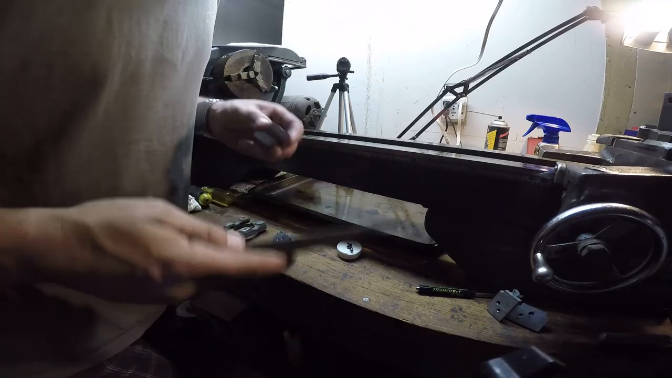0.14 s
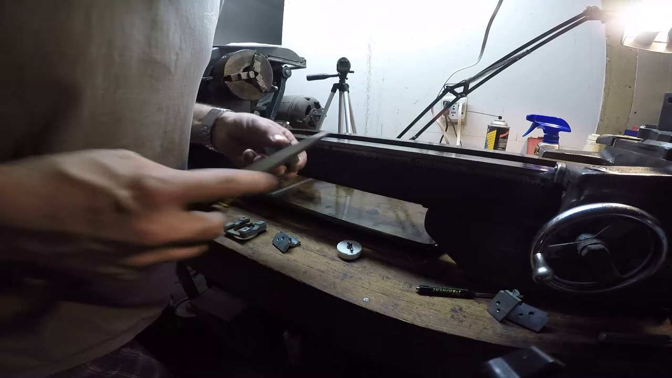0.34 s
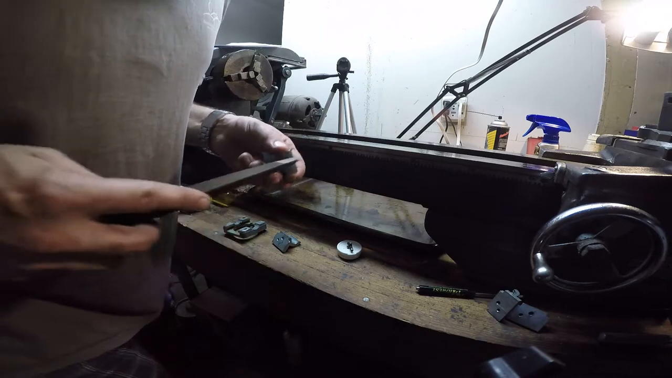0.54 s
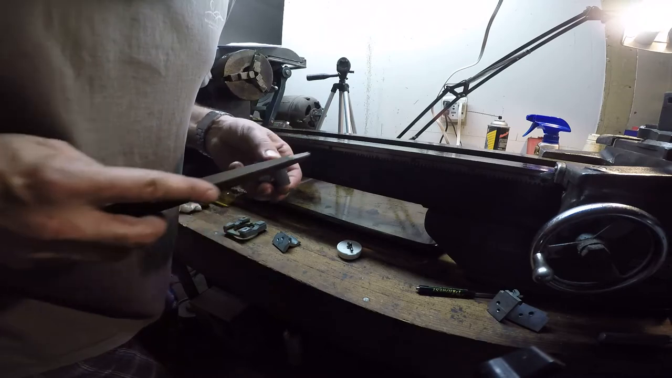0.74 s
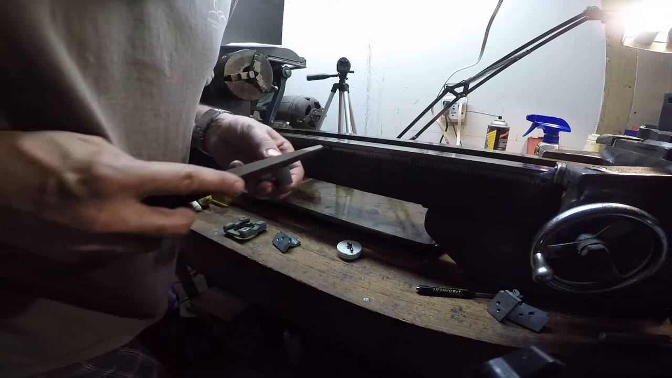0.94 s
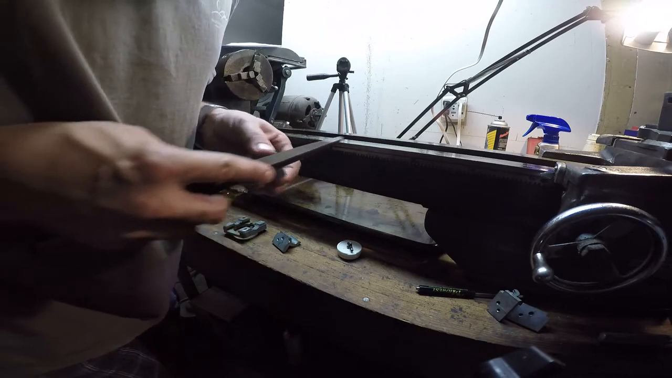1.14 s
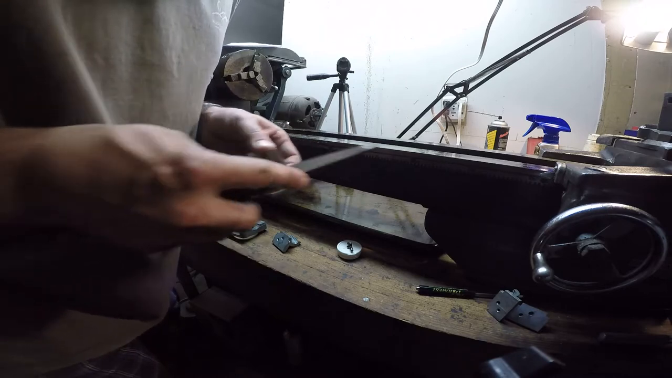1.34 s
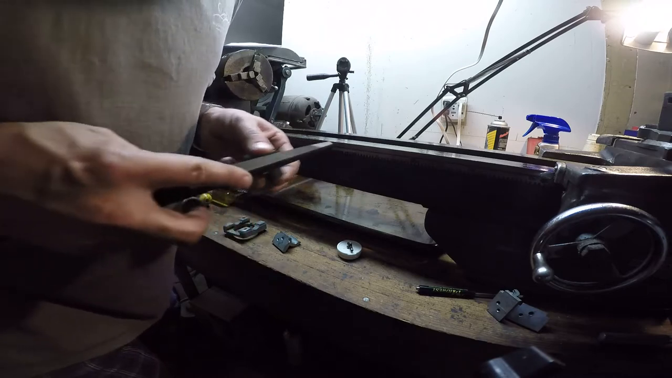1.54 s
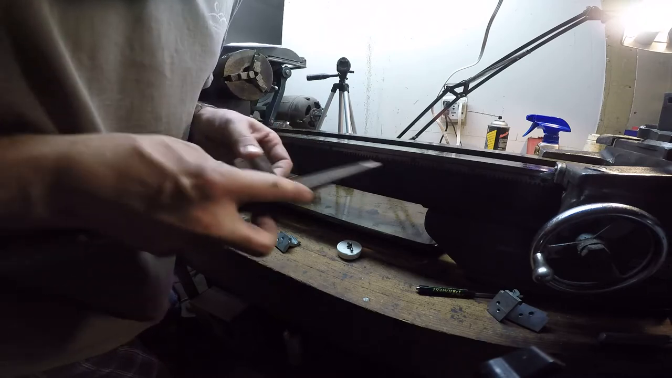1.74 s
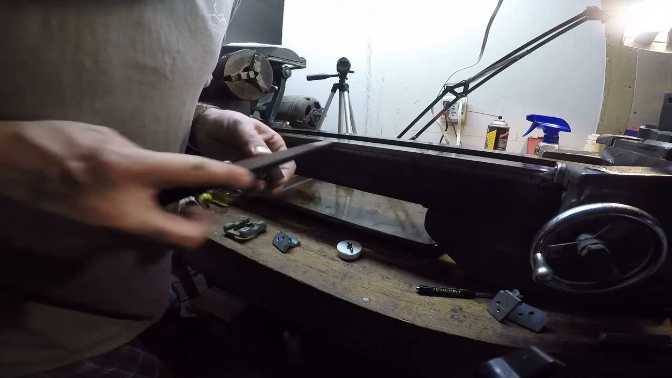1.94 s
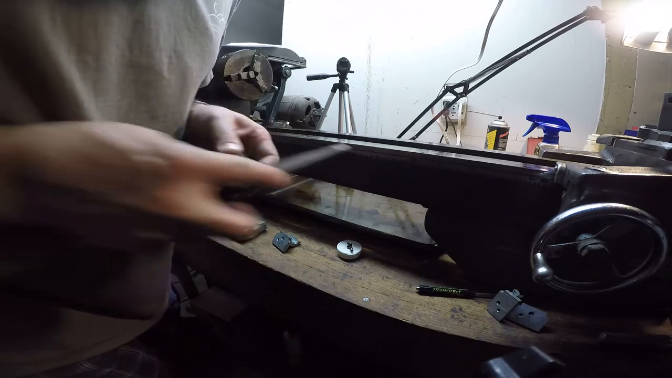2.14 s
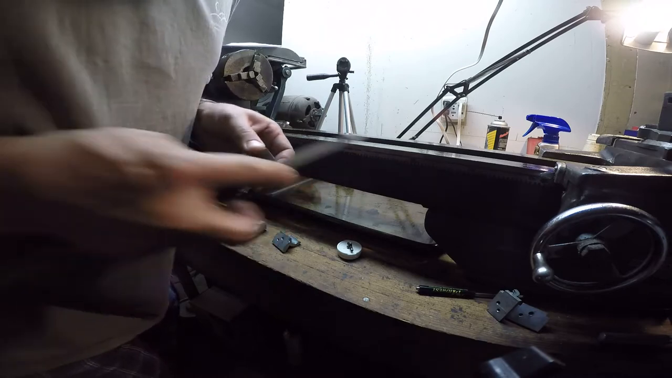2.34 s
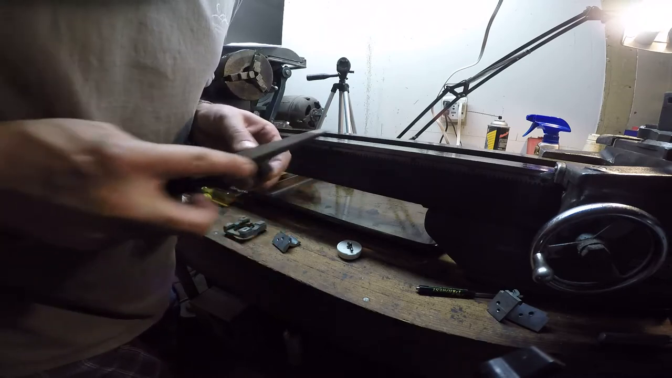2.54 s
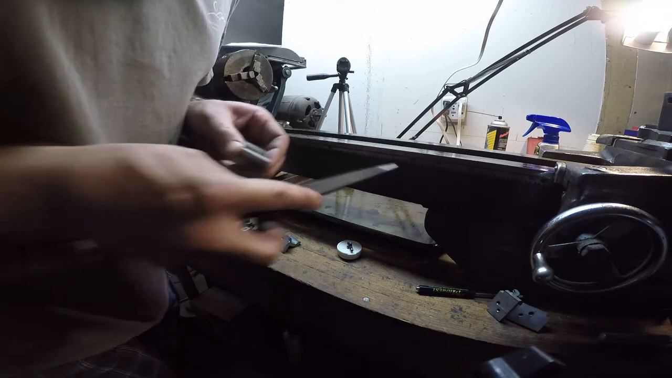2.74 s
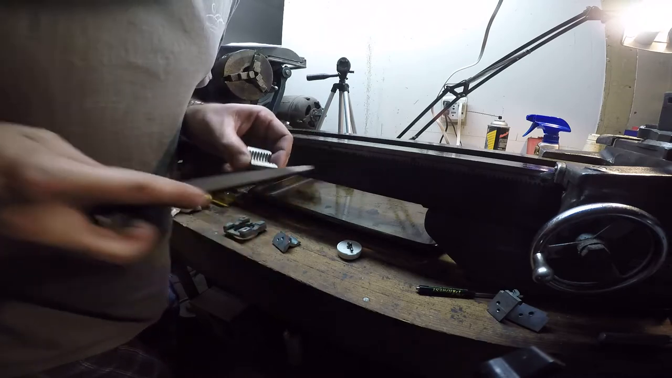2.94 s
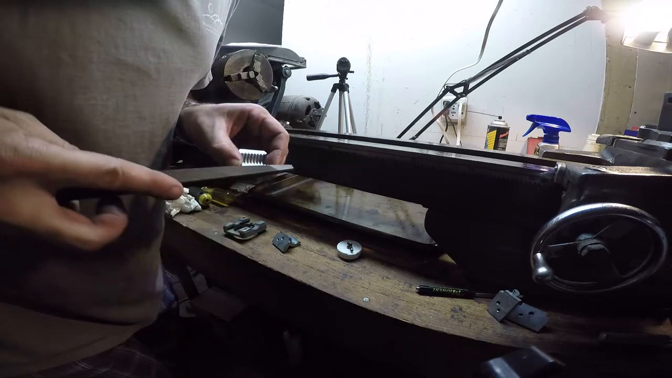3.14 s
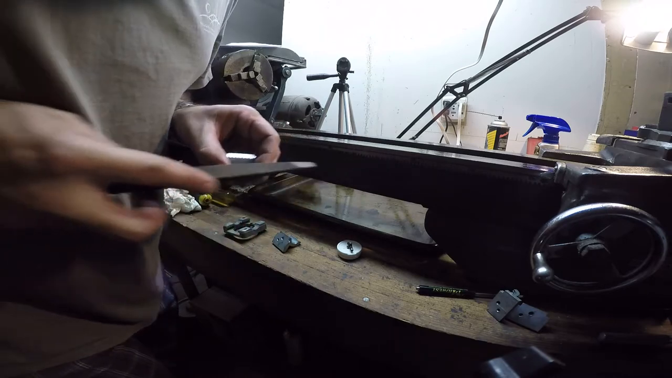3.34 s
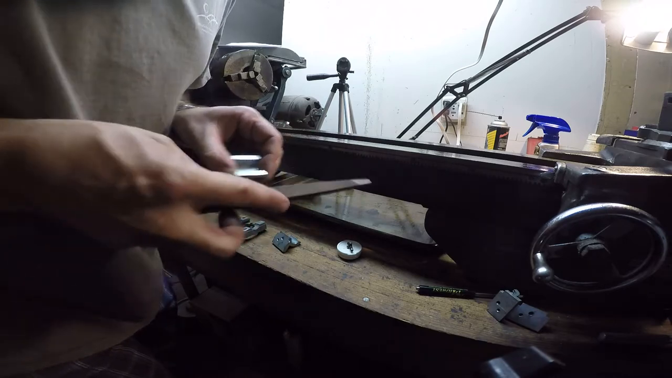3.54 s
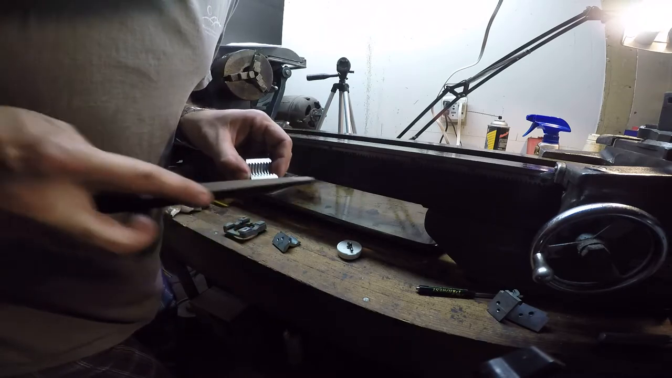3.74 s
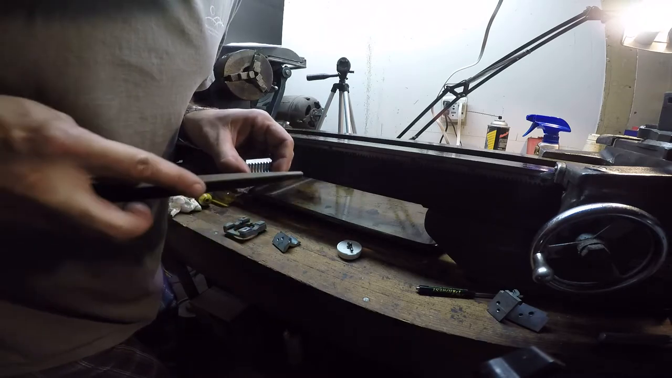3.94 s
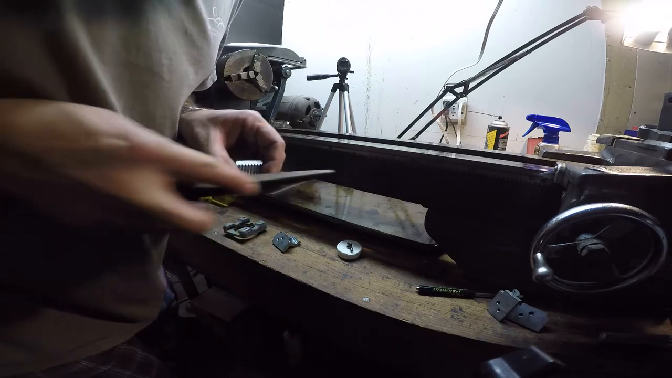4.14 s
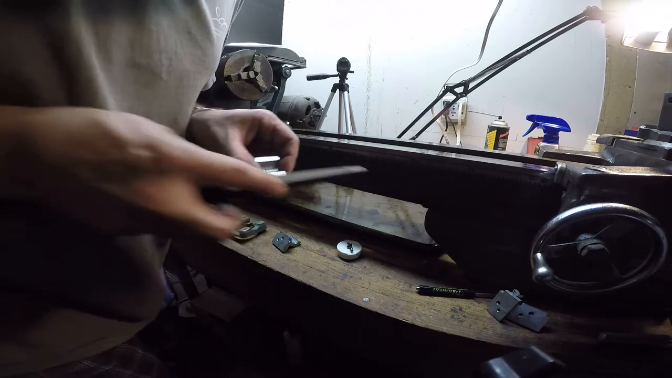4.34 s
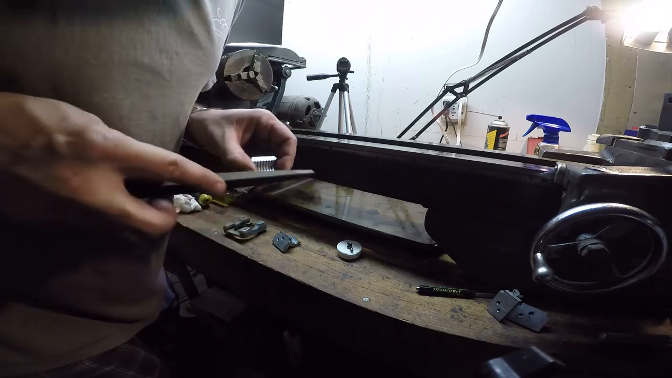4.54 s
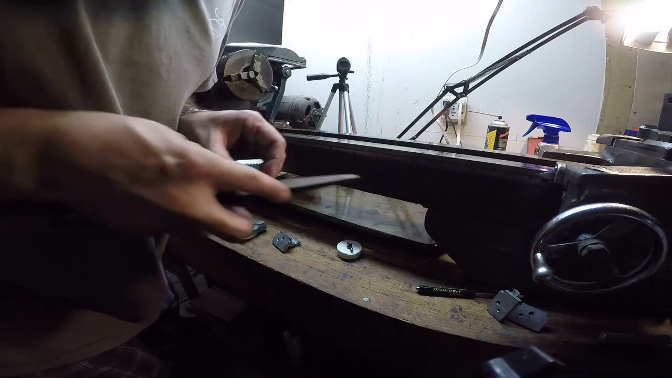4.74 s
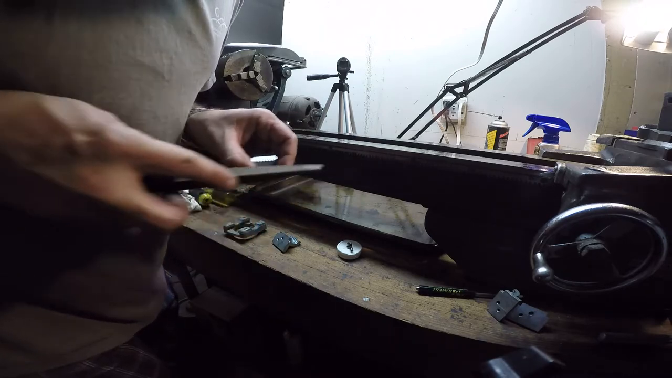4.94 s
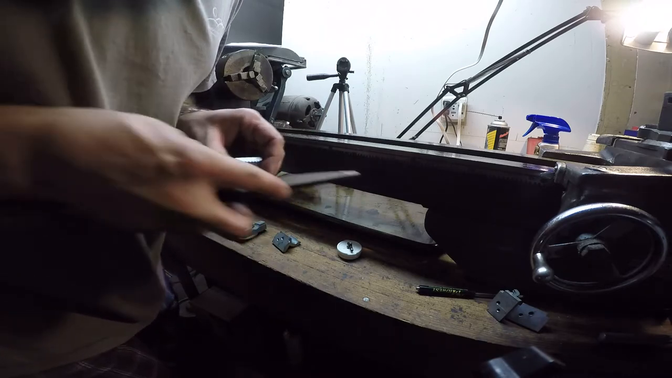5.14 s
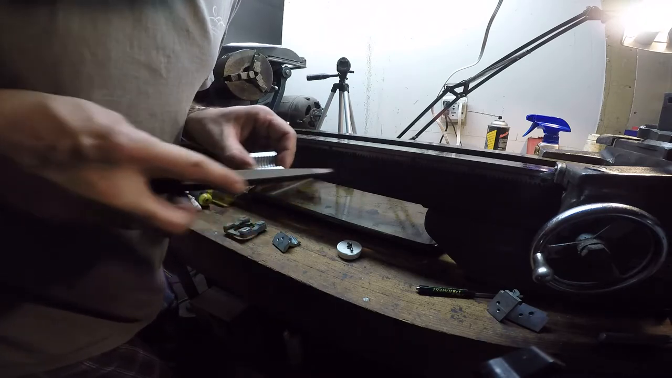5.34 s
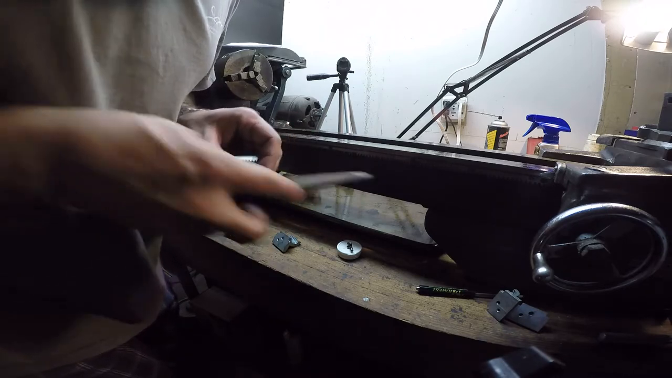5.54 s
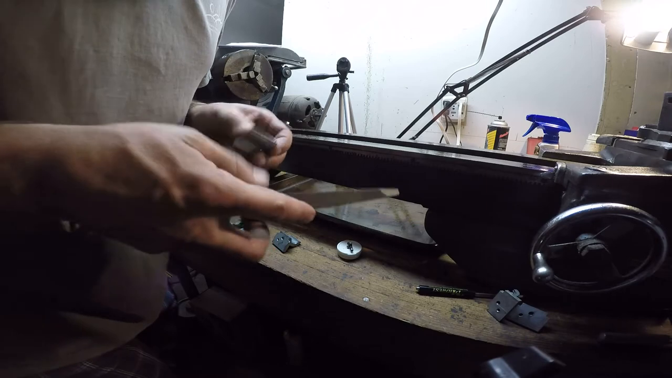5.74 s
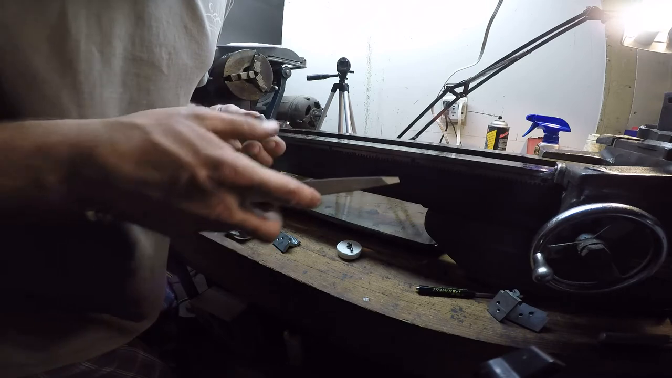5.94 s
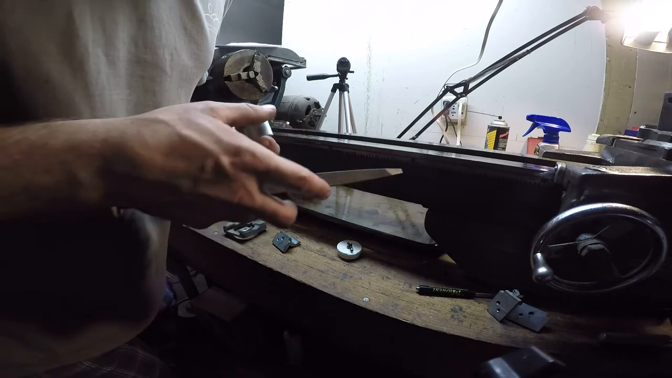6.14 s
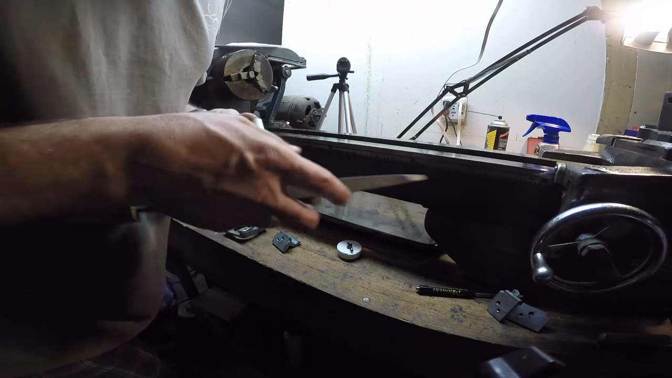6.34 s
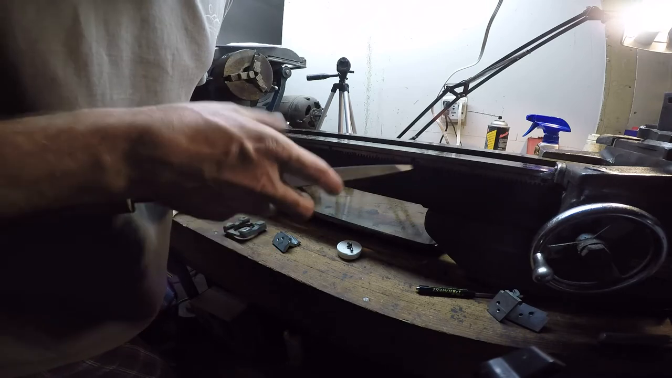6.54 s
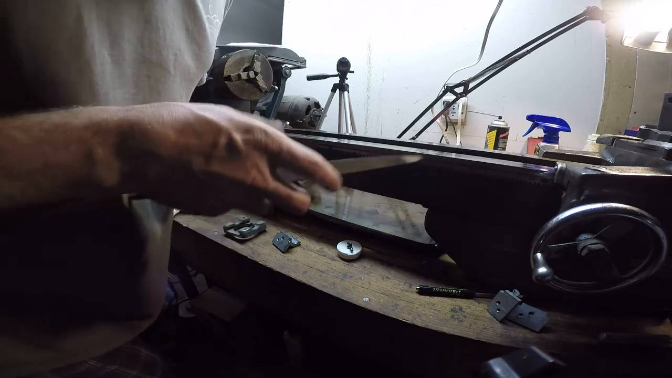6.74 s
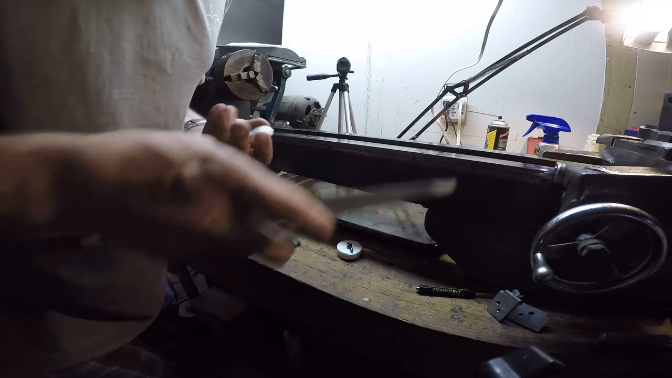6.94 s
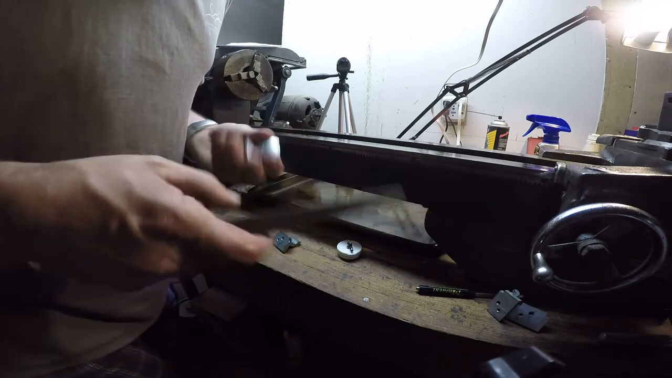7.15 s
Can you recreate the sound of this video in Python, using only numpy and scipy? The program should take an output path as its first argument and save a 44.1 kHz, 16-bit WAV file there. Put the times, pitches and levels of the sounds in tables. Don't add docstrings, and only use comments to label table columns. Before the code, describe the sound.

Short, separated metallic file scrapes with small taps and ringing blade, about arm's length away in a quiet cluttered workshop with a thin electronic whine.

```python
import sys
import numpy as np
from scipy import signal
from scipy.fft import rfft, irfft, next_fast_len
from scipy.io import wavfile
from scipy.ndimage import uniform_filter1d

SR = 44100
rng = np.random.default_rng(int(sys.argv[2]) if len(sys.argv) > 2 else 0)


def unload_wav(signal):
    wavfile.write(
        sys.argv[1],
        SR,
        np.round(np.clip(np.atleast_2d(signal).T, -1, 1) * 32767).astype(np.int16),
    )


def gain_from_decibels(decibels):
    exponent = np.asarray(decibels, float) / 20
    return 10 ** exponent


N = 317299


def resonance(x, hz, width_hz):
    r = np.exp(-np.pi * width_hz / SR)
    gain = (1 - r * r) / 2
    return signal.lfilter([gain, 0, -gain], [1, -2 * r * np.cos(2 * np.pi * hz / SR), r * r], x)


def ring(force, modes):
    power = sum(gain_from_decibels(db) ** 2 * np.pi * width / SR for hz, width, db in modes)
    out = np.zeros(N)
    for k, (hz, width, db) in enumerate(modes):
        out += (-1) ** k * gain_from_decibels(db) * resonance(force, hz, width)
    return out / np.sqrt(power)


def clicks(at, size):
    out = np.zeros(N + 2)
    whole = at.astype(int)
    np.add.at(out, whole, size * (1 - at + whole))
    np.add.at(out, whole + 1, size * (at - whole))
    return out[:N]


# frequency in Hz, level in dB per Hz.
SHOP_SPECTRUM = [(12, -38), (22, -1), (59, 0), (75, -9), (120, -12.5), (200, -14.5), (320, -21.5),
                 (700, -27.5), (1400, -29), (3300, -29.5), (5260, -34.5), (7500, -37.5), (11000, -39.5),
                 (15200, -44)]


def rumble_and_hiss(level_db=-56.5):
    hz, db = np.transpose(SHOP_SPECTRUM)
    size = next_fast_len(N)
    f = np.arange(size // 2 + 1) * SR / size
    shape = gain_from_decibels(np.interp(np.log(f + 1), np.log(hz), db))
    hiss = irfft(rfft(rng.standard_normal(size)) * shape, size)[:N]
    return hiss * gain_from_decibels(level_db) / hiss.std()


# frequency in Hz, level in dB.
WHINE_TONES = [(6307.75, -76.5), (12615.5, -71.5)]


def camera_whine(picture_hz=30000 / 1001, pause=.06):
    picture = np.arange(N) / SR * picture_hz % 1
    since_s = picture / picture_hz
    tones = sum(gain_from_decibels(db) * np.sqrt(2) * np.sin(2 * np.pi * hz * since_s) for hz, db in WHINE_TONES)
    return (picture > pause) * tones


def flutter(hz=5570, width_hz=68, level_db=-80.5):
    band = resonance(rng.standard_normal(N), hz, width_hz)
    return band * gain_from_decibels(level_db) / band.std()


# time in seconds, peak in dB, 3 kHz body in dB,
# bright body in dB, knock in dB.
TOUCHES = [(0.8595, -56.5, -3, -5, 0), (0.9654, -48, -8, -11, 3), (1.0186, -45.5, -11, -7, 4),
           (1.076, -40, -7, -22, 4), (1.0874, -38, -7, -12, 2), (1.1243, -40, -1, -20, 8),
           (1.1503, -33.5, 1.5, -26, 8.5), (1.4846, -41, 0, -31, 5), (2.0307, -39.5, 5.5, 2, 7.5),
           (2.5367, -40.5, -4, -8, 5.5), (3.2092, -52, -24, -22, -15), (3.3588, -54, 6.5, -0.5, 5),
           (3.9886, -41, -8.5, -42, -6), (4.5558, -42, -2, -14, -0.5), (4.669, -41, -8, -19, -9),
           (4.9606, -40, -0.5, -9, -23), (5.4002, -36.5, 6, 2, 6)]


def touch_downs(gain_db=21.0, low_db=-14):
    s, peak_db, upper_db, bright_db, _ = np.transpose(TOUCHES)
    return np.array([clicks(s * SR, gain_from_decibels(peak_db + gain_db + db)) for db in (0, low_db, upper_db, bright_db)])


# frequency in Hz, width in Hz, level in dB.
KNOCK_HUMPS = [(2420, 410, 4.5), (3300, 190, -21.5), (4730, 120, -8.5)]


def knock(gain_db=29.0):
    s, peak_db, _, _, dead_db = np.transpose(TOUCHES)
    force = clicks(s * SR, gain_from_decibels(peak_db + gain_db + dead_db))
    out = np.zeros(N)
    for hz, width, db in KNOCK_HUMPS:
        out += gain_from_decibels(db) * resonance(resonance(force, hz, width), hz, width)
    return out


# time in seconds, pressure as blade level in
# dB, sharpness of the bite in dB.
LANDING_PRESSURE = [
    [(1.01, -81, -6), (1.018, -54, -9), (1.036, -44, -11.5), (1.05, -51.5, -8), (1.072, -63, -18),
     (1.076, -47, -18), (1.096, -39, -15.5), (1.13, -46.5, -19), (1.138, -49, -7)],
]
FIRST_FACE_PRESSURE = [
    [(1.14, -42, -16), (1.148, -33, -23), (1.186, -31.5, -21.5), (1.206, -40.5, -9), (1.232, -36, -8.5),
     (1.28, -57, -19)],
    [(1.545, -70, -5), (1.549, -58.5, -16), (1.595, -40.5, -16), (1.605, -43, -18), (1.615, -32.5, -22),
     (1.645, -35.5, -19), (1.657, -30.5, -8), (1.691, -31, -2.5), (1.74, -57, -24)],
    [(2.042, -61, -2), (2.048, -55, -13), (2.076, -46, -14), (2.118, -40, -14)],
    [(2.12, -39, -14), (2.156, -36, -9), (2.166, -40, -13), (2.178, -50.5, -4), (2.198, -55, -17),
     (2.21, -55, -20)],
    [(2.548, -57, -10), (2.572, -32.5, -27), (2.596, -39.5, -16), (2.61, -31, -17.5), (2.624, -43, -4),
     (2.63, -42, -15), (2.64, -47.5, -4), (2.664, -58, -31), (2.68, -57, -15)],
]
SECOND_FACE_EARLY_PRESSURE = [
    [(3.33, -63, -4), (3.362, -59, -4), (3.384, -61.5, -9), (3.436, -58, -9), (3.448, -32.5, -38),
     (3.458, -38, -23), (3.49, -68, -9)],
    [(4.09, -57, -7), (4.122, -49.5, -6), (4.128, -34, -9), (4.156, -31.5, -8), (4.17, -31, -24),
     (4.186, -32.5, -30)],
    [(4.188, -30, -11.5), (4.196, -28, -10.5), (4.24, -58.5, -29)],
    [(4.575, -67, -5), (4.629, -47, -20), (4.641, -59, -6), (4.695, -39, -22), (4.711, -30, -8),
     (4.729, -35.5, -3), (4.741, -35, -11), (4.775, -69, -23)],
]
SECOND_FACE_LATER_PRESSURE = [
    [(5.012, -53, -11), (5.024, -45.5, -20), (5.036, -47.5, -15), (5.056, -43.5, -23), (5.072, -45, -21),
     (5.086, -40, -20)],
    [(5.088, -34.5, -14), (5.106, -31, -10.5), (5.15, -37.5, 0), (5.162, -47, -11), (5.175, -58, -14)],
    [(5.41, -46, -8), (5.42, -52, -7), (5.43, -39.5, -18), (5.44, -42, -16), (5.45, -39, -34)],
    [(5.452, -32.5, -20), (5.464, -30, -5), (5.474, -34, -20), (5.502, -28.5, -3), (5.53, -44, -18),
     (5.54, -56, -6)],
]
# time in seconds, teeth passing the edge in Hz.
HAND_SPEED = [
    [(1.021, 401), (1.079, 430), (1.171, 569.7), (1.22, 673), (1.271, 605)],
    [(1.55, 801.5), (1.61, 846), (1.631, 695), (1.66, 503), (1.689, 379.8), (1.731, 282)],
    [(2.05, 478), (2.129, 479.3), (2.2, 526.8)],
    [(2.55, 641.8), (2.585, 757), (2.61, 553.4), (2.67, 535.6)],
    [(3.34, 497), (3.445, 566), (3.478, 538)],
    [(4.1, 497), (4.129, 550.7), (4.148, 622.3), (4.165, 548.7), (4.18, 510.6), (4.2, 482.3)],
    [(4.6, 598.6), (4.661, 665), (4.69, 765), (4.721, 603.6), (4.759, 514.7)],
    [(5.03, 660), (5.088, 772), (5.111, 626.7), (5.14, 480), (5.169, 393)],
    [(5.42, 500.4), (5.456, 513), (5.511, 624.7), (5.54, 525.8)],
]


def hand():
    t = np.arange(N) / SR
    tables = LANDING_PRESSURE + FIRST_FACE_PRESSURE + SECOND_FACE_EARLY_PRESSURE + SECOND_FACE_LATER_PRESSURE
    strokes = [np.transpose(table) for table in tables]
    s, press_db, sharp_db = np.concatenate(strokes, axis=1)
    start, end = np.array([(c[0, 0], c[0, -1]) for c in strokes]).T
    number = np.searchsorted((end[:-1] + start[1:]) / 2, t)
    travel = (t - start[number]) / (end - start)[number]
    touching = (travel >= 0) & (travel <= 1)
    hz = np.interp(t, *np.transpose(sum(HAND_SPEED, [])))
    return np.interp(t, s, press_db), np.interp(t, s, sharp_db), hz, np.clip(travel, 0, 1), touching, number


def teeth(hz, grit, cross, jitter=.03, scatter_db=3.0, chatter_db=2.0, chatter_s=.004):
    grit, cross = np.clip(grit, 0, 1), np.clip(cross, 0, 1)
    passed = np.cumsum(2 * hz / SR)
    chance = rng.standard_normal((N // 16, 2))[:int(passed[-1])]
    number = np.arange(len(chance))
    chance = chance * np.sqrt(np.interp(number, passed, grit))[:, None]
    at = np.interp(number + 2 * jitter * chance[:, 0], passed, np.arange(N))
    here = at.astype(int)
    depth = np.where(number % 2, cross[here], 1) / np.sqrt(1 + cross[here] ** 2)
    strikes = clicks(at, depth * np.sqrt(SR / hz[here]) * gain_from_decibels(scatter_db * chance[:, 1]))
    torn = rng.standard_normal(N) * gain_from_decibels(2.5 * rng.exponential(size=N) - 3.7)
    wobble = uniform_filter1d(rng.standard_normal(N), int(chatter_s * SR)) * np.sqrt(chatter_s * SR)
    return np.sqrt(1 - grit) * strikes + np.sqrt(grit) * torn * gain_from_decibels(chatter_db * wobble)


def slide(table, travel, number):
    rows = np.transpose(table)[:, number]
    begin, end = rows[::2], rows[1::2]
    return begin + (end - begin) * travel


# frequency in Hz, width in Hz, level in dB.
LOW_MODES = [(1023, 51, 10), (1056, 33, 4.5), (1196, 510, 3.5), (1510, 430, 4.5)]
BODY_MODES = [(2040.5, 76, 9), (2096, 7.2, 2), (2316, 36, 1), (2338, 730, -5.5)]
UPPER_MODES = [(3250, 35.6, 13.5), (3310, 9.1, -19), (3316, 73, 11), (3690, 240, 4), (3890, 1120, -5.5)]
BRIGHT_MODES = [(4702, 128, 2), (4916, 47, -0.5), (5140, 110, -11), (5330, 2000, -20)]
SHRILL_MODES = [(6420, 56, 7), (6660, 140, -6), (7300, 130, -13), (6440, 1170, -15.5)]
FIZZ_MODES = [(8175, 85, 7), (7560, 78, -4), (8700, 1500, -10)]
AIR_MODES = [(9400, 100, 3.5), (10830, 360, -1), (11030, 200, 1), (14800, 130, -38), (10900, 6400, -17.5)]
THUMP_MODES = [(430, 450, 0)]
# grit share under full pressure 0-1, cross-cut teeth 0-1,
# low body at start in dB, at end in dB, thump in dB.
STROKE_CUT = [(0.54, 0.3, -11.5, -22, 12), (0.63, 0, -23, -8, 0), (0.38, 0.08, -17, -16, 0),
              (0.63, 0.61, -14, -20, -5), (0.46, 1, -14.5, -14, -12), (.35, 0.48, -24, -7.5, -8),
              (.2, 0.35, -12, -23, 4), (0.04, 1, -14, -21, -13), (0.33, 0.99, -20.5, -10, -7),
              (0.01, 0.16, -16, -16.5, -3), (0.35, 0.13, -13, -18, -4), (0.25, 0.1, -18.5, -20, -3),
              (0.32, 0.28, -16, -32, 3), (0.4, 0.11, -28, -15.5, -2)]
# 3 kHz share at start in dB, at end in dB,
# lean to 5 kHz at start in dB, at end in dB.
CONTACT_SLIDE = [(-1, -10, -3, 5), (-1.5, -15, -4, 7), (-4.5, -4.5, 8, -1), (-4, -3.5, 14, 0),
                 (-7.5, -9, -8, 9), (-2.5, -11, 11, -14), (3, -7.5, 6, 2), (6, 0, 14, 1), (-1, -6, -13, -7),
                 (0, -9, 12, -8.5), (3, -2, 5, -9), (-4.5, -8.5, -7, 6.5), (1, -8, 6, 9),
                 (-2.5, -5, -8.5, -4)]
# fizz at start in dB, at end in dB,
# lean to 10 kHz at start in dB, at end in dB.
SHEEN_SLIDE = [(12.5, 1, 7, 16), (8, 2, 1, -13), (9.5, -2.5, 9, -15), (-2, 10, 5, 3), (5, 6, -5, 3),
               (11, 3, 7, -3), (4, 6, 4, -5), (-1, -3, 8, 11), (-2.5, -3, -5, 0), (2, 1, 2, -4),
               (0, 4, 2, 0), (-5, -1, -4, -1), (3, 0, 0, 2), (2.5, 3, 0, -10)]


def file_strokes(bright_db=0.87, fizz_follows=0.57, tap_fizz_db=-3):
    press_db, sharp_db, hz, travel, touching, number = hand()
    grit, cross, low_from, low_to, thump_db = np.transpose(STROKE_CUT)[:, number]
    low_db = low_from + (low_to - low_from) * travel
    share_db, lean_db = slide(CONTACT_SLIDE, travel, number)
    fizz_db, air_db = slide(SHEEN_SLIDE, travel, number)
    share, lean, lean_up = gain_from_decibels(share_db), gain_from_decibels(lean_db / 2), gain_from_decibels(air_db / 2)

    grit = grit + .025 * (-29 - press_db)
    force = teeth(hz, grit, cross) * touching * gain_from_decibels(press_db)
    body_push = 1 / np.hypot(1, share)
    upper_push = share / np.hypot(1, share)
    push = [body_push, gain_from_decibels(low_db), upper_push, gain_from_decibels(sharp_db + bright_db)]
    body, low, upper, bright = force * push + touch_downs()

    fizz = bright * gain_from_decibels(fizz_db + np.where(touching, (fizz_follows - 1) * sharp_db, tap_fizz_db))
    bright = bright / np.hypot(lean, 1 / lean)
    blade = ring(body, BODY_MODES) + ring(low, LOW_MODES) + ring(upper, UPPER_MODES)
    blade += ring(bright * lean, BRIGHT_MODES) + ring(bright / lean, SHRILL_MODES)
    top = gain_from_decibels(-23.5) * ring(fizz / lean_up, FIZZ_MODES)
    top += gain_from_decibels(-23.0) * ring(fizz * lean_up, AIR_MODES)
    thump = ring(force * gain_from_decibels(thump_db - 29.0), THUMP_MODES)
    return blade + top + thump


# start in seconds, frequency in Hz, peak in dB,
# 60 dB decay in seconds.
FREE_MODES = [(1.24, 2050, -57, 0.17), (1.485, 3350, -57, 0.14), (1.7, 3280, -56, 0.28),
              (2.125, 1000, -53, .25), (2.165, 1040, -52.5, 0.22), (2.165, 2090, -48.5, 0.28),
              (2.6, 1081, -49, 0.26), (2.62, 3310, -62, .3), (3.211, 2075, -58.5, 0.21),
              (3.47, 3295, -62, 0.16), (4.21, 3250, -56, 0.33), (4.961, 3305, -51, .15),
              (5.14, 3290, -58, 0.24), (5.15, 4758, -56, 0.26), (5.51, 3300, -56, 0.32)]


def free_rings():
    t = np.arange(N) / SR
    out = np.zeros(N)
    for s, hz, db, t60 in FREE_MODES:
        decay = gain_from_decibels(db - 60 * np.maximum(t - s, 0) / t60)
        out += decay * (t > s) * np.sin(2 * np.pi * hz * (t - s))
    return out


def room(x, t60_s=0.24, level_db=-19, dull_hz=4770):
    t = np.arange(SR // 2) / SR
    tail = rng.standard_normal(len(t)) * gain_from_decibels(-60 * t / t60_s) * (t > .004)
    tail = signal.lfilter(*signal.butter(1, dull_hz, fs=SR), tail)
    return gain_from_decibels(level_db) * signal.fftconvolve(x, tail / np.sqrt(np.sum(tail ** 2)))[:N]


def scene():
    background = rumble_and_hiss() + camera_whine() + flutter()
    file = knock() + file_strokes() + free_rings()
    return (background + file + room(file))[None]


def band_limit(x):
    return signal.sosfilt(signal.butter(12, 15240, fs=SR, output="sos"), x)


def record(dry):
    low_pass = signal.ellip(8, .2, 60, 15300, fs=SR, output="sos")
    mix = signal.sosfilt(low_pass, dry)
    return band_limit(mix)


dry = scene()
out = record(dry)
unload_wav(out)
```